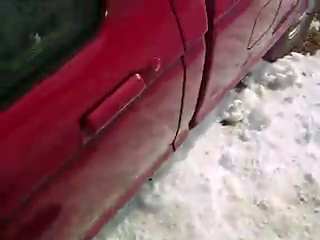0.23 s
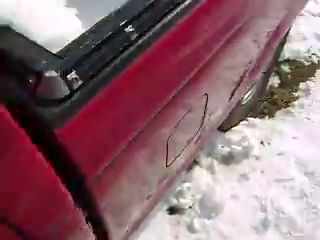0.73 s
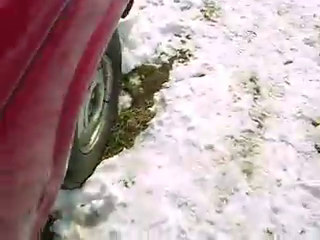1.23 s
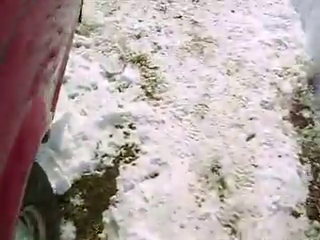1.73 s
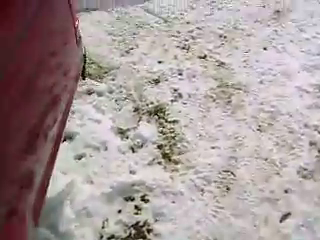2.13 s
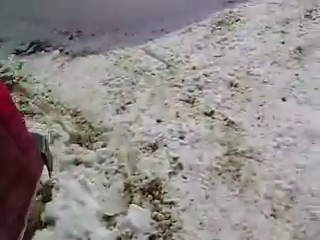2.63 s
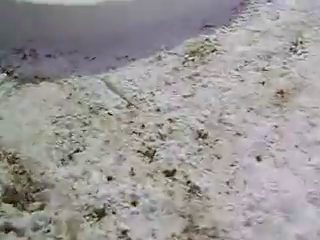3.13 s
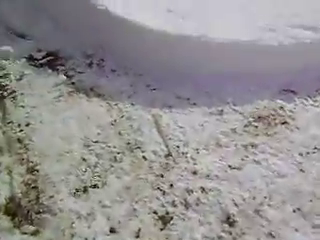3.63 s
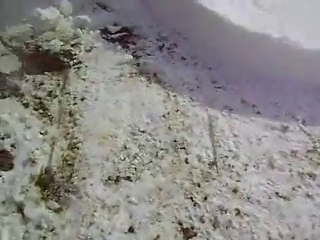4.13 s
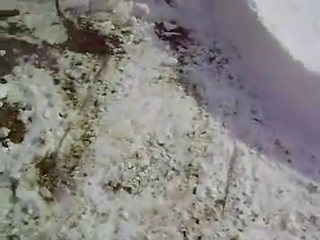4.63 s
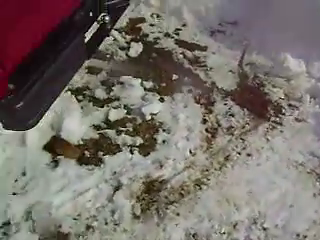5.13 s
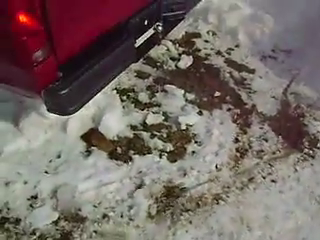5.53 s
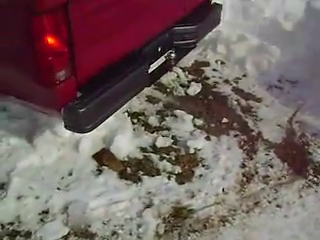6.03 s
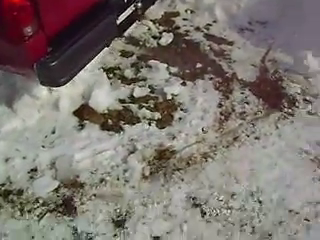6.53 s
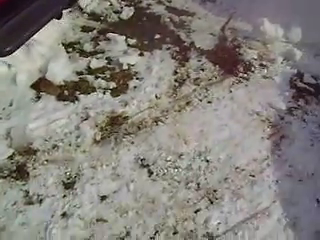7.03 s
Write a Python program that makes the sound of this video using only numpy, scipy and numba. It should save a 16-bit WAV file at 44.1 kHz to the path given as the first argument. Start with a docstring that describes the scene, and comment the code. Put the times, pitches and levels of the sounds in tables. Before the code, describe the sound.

Outdoors in snow, a rough V8 exhaust thumps and lopes at idle while boots crunch faintly and sharp whistling spits build into harsh crackle.

```python
"""Cold V8 idling in snow

A cold V8 pickup lopes at idle while someone walks a small camera along its side, through snow, to the tailpipe.
Each firing thumps as a pressure swing that rings the pipe, and blows a whistling puff of noisy gas.
Strong firings spit: a gliding whistle and a crack of hiss, some loud enough to clip.
The warming exhaust shell ticks, boots crunch as grains of noise, and the engine bay whirs underneath."""
import sys
import numpy as np
from scipy import signal
from scipy.io import wavfile
from scipy.ndimage import uniform_filter1d
from numba import njit

SR = 44100
rng = np.random.default_rng(int(sys.argv[2]) if len(sys.argv) > 2 else 0)


def bounce(signal):
    """Save signal as a 16-bit WAV file at the path given by the first command-line argument."""
    frames = np.transpose(np.atleast_2d(signal))
    limited = np.clip(frames, -1, 1)
    pcm = np.round(limited * 32767).astype(np.int16)
    wavfile.write(sys.argv[1], SR, pcm)


N = 320607


def undb(db):
    """Decibels to gain."""
    return 10 ** (np.asarray(db) / 20)


def unit(x):
    """Scale to rms 1."""
    return x / np.sqrt(np.mean(x ** 2))


@njit
def svf(x, hz, width):
    """State-variable band-pass, gain 1 at the centre."""
    y, band, low = np.empty(len(x)), 0., 0.
    g, damping = np.tan(np.pi * hz / SR), width / hz
    for i in range(len(x)):
        v = (band + g * (x[i] - low)) / (1 + g * (g + damping))
        band, low, y[i] = 2 * v - band, low + 2 * g * v, damping * v
    return y


def ring(x, modes):
    """Sum of resonances (center_hz, width_hz, level_db)."""
    return sum(undb(db) * svf(x, float(hz), float(width)) for hz, width, db in modes)


def add(track, at_s, sound):
    """Mix a short sound into a track."""
    i = max(int(at_s * SR), 0)
    sound = sound[:max(len(track) - i, 0)]
    track[i:i + len(sound)] += sound


def swell(rise_s, fall_s):
    """An envelope that builds up, then dies away; top 1."""
    t = np.arange(int(8 * fall_s * SR)) / SR
    shape = (1 - np.exp(-t / rise_s)) ** 2 * np.exp(-t / fall_s)
    return shape / shape.max()


def curve(t, points):
    """Read a two-column table as straight lines between its points."""
    return np.interp(t, *np.transpose(points))


DIP_HZ, DIP_WIDTH_HZ, DIP_SHARE = 1535, 370, 0.42


def dip(x):
    """Sound bouncing off ground and bodywork partly cancels in one band."""
    return x - DIP_SHARE * svf(x, float(DIP_HZ), float(DIP_WIDTH_HZ))


# surges of the cold idle, as the engine catches: peak_s, thump_rise_db, puff_rise_db
SURGE_TABLE = [(0.051, 5.5, 3.5), (0.599, 3, 0.5), (1.172, 5, 6.5), (1.737, 6.5, 8), (2.3, 5.5, 3.5),
               (2.874, 2.5, 3.5), (3.451, 7.5, 3), (4.038, 3.5, 1.5), (4.599, 4, 0.5), (5.17, 4.5, 2.5),
               (5.741, 3, 9.5), (6.269, 7.5, 7.5), (6.828, 4, 8), (7.39, -18, -8)]
FIRST_LOPE_S, SURGE_SHARPNESS = 0.42, 2.5  # length of the lope before the first surge; exponent


def lope(t):
    """Count of lopes at time t: whole numbers fall on the surges."""
    peak_s = np.array(SURGE_TABLE)[:, 0]
    return np.interp(t, np.r_[peak_s[0] - FIRST_LOPE_S, peak_s], np.arange(-1, len(peak_s)))


def surge(t):
    """Strength of the engine's catch: 1 at a surge, 0 halfway between two."""
    return np.abs(np.cos(np.pi * lope(t))) ** SURGE_SHARPNESS


# base levels between surges, broadly rising toward the tailpipe: time_s, thump_db, puff_db
LULL_LEVELS = [(0, -28.5, -40.5), (.8, -25, -40), (1.45, -25, -44), (2, -24.5, -45.5), (2.6, -22, -35),
               (3.15, -23.5, -40), (3.7, -23.5, -35.5), (4.3, -23, -32.5), (4.9, -21.5, -33.5),
               (5.45, -21.5, -30.5), (6, -24.5, -36), (6.5, -23.5, -33.5), (7.27, -20, -34.5)]
CYCLE_S = .1879  # one round of about eight firings


def load_db(t, column, throb_db, lag_s):
    """Lull level plus the nearest surge, and a throb each round as some cylinders fire harder."""
    nearest = np.round(lope(t)).astype(int).clip(0)
    rise_db = np.array(SURGE_TABLE)[nearest, column]
    lull = np.array(LULL_LEVELS)
    lull_db = np.interp(t, lull[:, 0], lull[:, column])
    throb = np.cos(2 * np.pi * (t - lag_s) / CYCLE_S)
    return lull_db + rise_db * surge(t) + throb_db * throb


IDLE_FIRING_HZ, SURGE_GAIN_HZ, SPEED_LAG_S = 42.1, 6.5, .03


def firings(t):
    """Each surge speeds the engine up; ordinary firings fill the gaps between spits, a little early or late."""
    due = np.cumsum(IDLE_FIRING_HZ + SURGE_GAIN_HZ * surge(t - SPEED_LAG_S)) / SR
    spit_s = np.array(SPIT_TABLE)[:, 0]
    marks = np.interp(np.r_[.01, spit_s + .005, t[-1]], t, due)
    # a whole number of firings, at least one, between neighbouring marks
    number = np.r_[0, np.cumsum(np.round(np.diff(marks)).clip(1))]
    even_due = np.interp(np.arange(number[-1] + 1), number, marks)
    even_s = np.interp(even_due, due, t)
    return even_s + 0.000668 * rng.standard_normal(N // 500)[:len(even_s)]


# exhaust pipe and muffler resonances, relative levels: center_hz, width_hz, level_db
PIPE_MODES = [(56.4, 7.9, 13), (91, 26, -3.5), (124.2, 16, -5), (178.8, 28, 3), (196.4, 16, 7.5),
              (239.6, 40, 12.5)]
# which of the two unevenly firing banks feeds each firing in a round: far_pipe (1 = far, 0 = near)
BANK_ORDER = [0, 1, 1, 0, 1, 0, 0, 1]
FAR_LAG_S, MUFFLER_HZ = 0.0052, 349
QUICKEN_S = .012  # the swing after a drop quickens: its phase has doubled by this time
REBOUND_SPAN, REBOUND_SPREAD = 2.41, .2  # decay of the swing in drop widths; its random spread (log)


def thumps(fire_s):
    """Each gas slug is a pressure rise and a steep drop that swings back and rings the pipe; turbulence rumbles."""
    chance = rng.standard_normal((N // 500, 5))[:len(fire_s)]
    far = np.resize(BANK_ORDER, len(fire_s))
    size_db = 1.3 * chance[:, 0]
    late_s = FAR_LAG_S * far + 0.0012 * chance[:, 1]
    # a firing that spits takes its thump size and timing from the spit
    for s, _, _, crack_ms, *_, thump_db in SPIT_TABLE:
        k = np.argmin(np.abs(fire_s - s - .005))
        size_db[k] = thump_db
        late_s[k] = s + crack_ms / 1000 + .004 - fire_s[k]
    slugs, t = np.zeros(N), np.arange(-600, 600) / SR  # 0 = the middle of the drop
    for s, db, (rise, drop, swing) in zip(fire_s + late_s, size_db, chance[:, 2:]):
        width_s = np.where(t < 0, 0.0028 * np.exp(0.26 * rise), 0.002 * np.exp(0.12 * drop))
        span = np.where(t < 0, 1.3, REBOUND_SPAN * np.exp(REBOUND_SPREAD * swing))
        level = undb(db + np.where(t < 0, 2.5 - 1.0 * rise, 0))
        wave = np.sin(t / width_s * (1 + t.clip(0) / QUICKEN_S))
        fade = np.exp(-(t / width_s / span) ** 2 / 2)
        add(slugs, s + t[0], -level * wave * fade)
    rumble = ring(rng.standard_normal(N), [(28.2, 9.9, 2.0), (58.7, 15, -4.5), (103.0, 65.0, -1.0)])
    pipe = unit(undb(-1) * slugs + ring(slugs, PIPE_MODES)) + undb(-11) * unit(rumble)
    # the muffler passes only the lows
    muffler = signal.butter(5, MUFFLER_HZ, fs=SR, output="sos")
    return unit(signal.sosfiltfilt(muffler, pipe))


CRACK_RISE_S, CRACK_FALL_S, TRAIL_S, TRAIL_DB = 0.0021, 0.0033, 0.015, -5
SHRILL_WIDTH_HZ, SHRILL_DB = 56, -4.5
RING_DB, RING_S = -18.5, 0.041  # the whistle rings on after a spit
RAGGED_DB = 2.5  # random spread of the crack's millisecond grains


def jet(hz, crack_ms, hiss_db, shrill_hz, air, body, chance):
    """One spit: an unsteady whistle that glides as the jet forms, a rough body, and a crack of partly shrill hiss."""
    t = np.arange(SR // 14) / SR
    shape = (t / .010 * np.exp(1 - t / .010)) ** 4
    wobble = uniform_filter1d(chance[:len(t)], size=40)
    pitch_hz = hz + (660 - hz) * np.exp(-(t / 0.006865) ** 2)  # from 660 Hz to its own pitch
    whistle = np.sin(2 * np.pi * np.cumsum(pitch_hz * (1 + 0.55 * wobble)) / SR)
    since = t - .008 - crack_ms / 1000
    crack = np.exp(-(since / np.where(since < 0, CRACK_RISE_S, CRACK_FALL_S)) ** 2 / 2)
    trail = undb(TRAIL_DB) * np.exp(-np.abs(since) / np.where(since < 0, CRACK_RISE_S, TRAIL_S))
    shrill = unit(svf(chance[:len(t)], float(shrill_hz), float(SHRILL_WIDTH_HZ)))
    hiss = air[:len(t)] + undb(SHRILL_DB) * shrill
    grains = np.repeat(chance[len(t):len(t) + 80], repeats=44)[:len(t)]
    ragged = undb(RAGGED_DB * grains)
    ring_on = undb(RING_DB) * (1 - np.exp(-(t / .014) ** 4)) * np.exp(-(t - .012) / RING_S)
    tone = (shape + ring_on) * whistle / 2
    rough = undb(-10.0) * shape * body[:len(t)]
    return tone + rough + undb(hiss_db - 7.5) * (crack + trail) * ragged * hiss


# strong firings that spit; each spit begins 8 ms before time_s, its crack comes crack_ms after time_s, and
# levels are relative: # time_s, level_db, whistle_hz, crack_ms, hiss_db, shrill_hz, thump_db
SPIT_TABLE = [(0.066, -23, 1206, 12, -12, 2200, 4.5), (1.081, -17.5, 1230, 4.5, -10, 2350.0, 4),
              (1.185, -20, 506, 9, -10, 2080, 2), (1.64, -15.5, 1246, 4, -5.5, 2516, 3.5),
              (1.73, -13.0, 1220, 2, -22, 2020.0, -2.5), (1.752, -17, 1247, -0.5, -3.5, 2070, 1),
              (2.158, -22.5, 680, 4.5, -4, 1520, -0.5), (2.176, -19.5, 1240, 5, -21, 2390.0, 8.5),
              (2.2, -11.5, 1160, 11, -10, 1650, -5), (2.246, -24, 530, 5.5, -27, 1660.0, -1),
              (2.289, -11, 1026, 1.5, -8.5, 1510.0, 1), (2.31, -12.5, 1106, 1.5, -9, 1780, 7),
              (2.721, -26, 800, 4.5, -4, 1560, 4.5), (2.797, -30, 660, 5.5, -10.5, 2050.0, -1),
              (2.823, -28, 690, 8, 1, 2250, 5), (2.848, -19, 870, 0, 0.5, 3030, -2.5),
              (2.87, -15.5, 1220, 6, -4.5, 4680, 7.5), (3.247, -18.5, 1140, 1, -6, 2990.0, 0.5),
              (3.322, -16.5, 747, 6, -7, 2880, 0.5), (3.35, -11, 1130, -4.5, -4, 2240, -7.5),
              (3.388, -17, 753, 4, -3.5, 1810, -1.0), (3.411, -17.5, 640, 6.5, -4, 3620, -4),
              (3.453, -15.5, 465, 1, 3.5, 4400, 0.5), (3.553, -17, 700, 7, -6.5, 3270, 3.5),
              (3.577, -19.5, 506, 2, -1.5, 2910, 0.5), (3.718, -35, 714, 5, 6, 3100, -5.5),
              (3.734, -18, 653, 10.5, -7, 1910, 7.5), (3.86, -12.5, 658, 7.5, -6.5, 2950, 1),
              (3.94, -17.5, 717, 3, -0.5, 2070, 0.5), (3.966, -14, 620, 2.5, -8, 3080.0, 1),
              (3.988, -8, 1337, 3, 0.5, 3040, 4), (4.011, -11, 712, 5.5, -1, 3260, 6.5),
              (4.076, -12.5, 775, 3, 5, 2160, 10.5), (4.115, -11, 684, 7.5, -8.5, 1970, 7.5),
              (4.136, -20.5, 730, 10.5, -5, 2110.0, -1.5), (4.295, -15, 738, 10, -10.0, 2220.0, 6.5),
              (4.419, -14, 650, 4.5, -1.5, 1460, 7.5), (4.498, -20, 726, 8, -0.5, 2090, -6),
              (4.529, -12, 636, 4, -9, 3070, 4), (4.551, -7, 1223, 3.5, 0, 1610, 1),
              (4.575, -12, 1280, -1, -1, 2040, 8), (4.64, -14, 1100, 1, 9.5, 3160, 8.5),
              (4.679, -12.5, 650, 11, -29, 2800.0, 4.5), (4.701, -14, 640, 4.5, -3.5, 3020, -8),
              (4.864, -15, 703, 4.5, -9, 2070, 3.5), (4.891, -25.5, 710, 6, 2, 3950, 6),
              (4.995, -5, 1173, 4.5, -10.5, 3770, -3), (5.069, -22.5, 653, 9, -1, 4740, 0),
              (5.1, -17.5, 530, 4.5, 1, 2210, 4), (5.123, -3.5, 1020, 1.5, -5.5, 2220, -4.5),
              (5.143, -9, 1004, 7, -3, 2230, 5), (5.21, -4, 898, 0.5, -1.5, 2834, 5.5),
              (5.246, -11.5, 814, 14.5, -33, 2550, -23), (5.268, -15, 500, 6, -0.5, 2290, 4),
              (5.387, -19, 1000, 0.5, -31, 2180, 5.5), (5.423, -12.5, 747, 9.5, -4.5, 2490, 6.5),
              (5.451, -19.0, 530, 5, -5, 2240, 0.5), (5.529, -19.5, 1020, 11.5, -6, 2220, -6.5),
              (5.547, -10.5, 738, 1, -2, 1640, 3), (5.623, -12.5, 783, 5.5, -21, 2740, 2.5),
              (5.668, -3, 1410, 3, -5.5, 1700, 1.5), (5.693, -9.5, 1215, 4, -8, 2240, 5.5),
              (5.755, -5.5, 1198, 1, -3.5, 2615, 3), (5.797, -12.5, 806, 3, -9, 2160, 9.5),
              (5.986, -13.5, 620, 7.5, -10, 1930, 9), (6.014, -22.5, 1110, 7.5, -4, 2600, 8.5),
              (6.121, -10, 1295, 2, -6, 1420, 6), (6.149, -19, 980, 10, -29, 4220.0, -11),
              (6.193, -16.5, 740, 5.5, -5.5, 2130.0, -6), (6.222, -10, 543, 3, -8, 3680, -3),
              (6.244, -3, 991, 5, -8, 2664, 3), (6.267, -9.5, 854, 4.5, -3, 4320, 4.5),
              (6.314, -19, 930, -6.5, -16, 2110.0, -1.5), (6.336, -33.5, 694, 3.5, 10, 2970.0, -2),
              (6.355, -38, 690, 8, 7, 2500.0, -2.5), (6.369, -15, 840, 4, -13, 2110.0, 1),
              (6.393, -26.5, 730, 9, 2.5, 2370, 0), (6.548, -31, 644, -1.5, -7, 2600, 5),
              (6.689, -17.5, 1105, 6, -0.5, 2575, 7.5), (6.72, -2.5, 1150, 2, -9.5, 3990, 0.5),
              (6.76, -18.5, 790, 7.5, -1, 1700, 3.5), (6.8, -4, 1008, 10.5, -2.5, 3856, -1.5),
              (6.826, -2.5, 1004, -2.3, -12.5, 2160, 12), (6.914, -17, 804, 3, -3, 1480, 3),
              (6.942, -26, 680, 2.5, 6, 2930, 3.5), (7.063, -18, 1045, -1.5, -10, 2500, -3),
              (7.106, -14.5, 1083, 5, -8, 2970, 8.5), (7.128, -31, 710, 10.5, 11, 4600, 1.5),
              (7.225, -15, 983, 11.5, -3.5, 1510, 14)]
# tailpipe mouth resonances as the gas rings it, relative levels: center_hz, width_hz, level_db
MOUTH_MODES = [(543, 178, 8.5), (741, 140, 6.5), (1046, 52, 7.5), (1181, 120, 5.5), (2032, 97, -6.5),
               (3130, 16, -10.5), (2120, 2720, -4.5), (4550, 1000, -22), (5100, 790, -8.5)]
# whistle of ordinary firings against their noise, as the camera turns to the tailpipe: time_s, level_db
FACING_CURVE = [(0, -29), (2, 5), (3.298, 0.5), (7.27, -3.5)]


def gas(fire_s, puff_db):
    """Every firing blows a noisy, softly whistling puff through the mouth; strong ones spit, and the mouth rings on."""
    gate, soft, chance = np.full(N, .22), np.zeros(N), rng.standard_normal((N // 500, 3))
    noise = rng.standard_normal((3, N + SR))  # air, body, raw chance
    noise[:2] = unit(ring(noise[0], MOUTH_MODES[4:])), unit(ring(noise[1], MOUTH_MODES[:5]))
    puff = swell(.005, .007)
    for s, (size, loud, pitch) in zip(fire_s, chance):
        add(gate, s - .012, undb(4.0 * size) * puff)
        whistle_hz = (1090 if pitch > .6 else 700) * np.exp(.06 * size)
        shrill_hz = 2600 * np.exp(0.17 * size)
        soft_jet = jet(whistle_hz, 2.7, -15.0, shrill_hz, *noise[:, int(s * SR):])
        add(soft, s - .015, undb(5.6 * loud) * soft_jet)
    # condensed water spatters in the gas
    spatter = np.repeat(rng.exponential(size=N // 90 + 1).clip(0, 3), repeats=90)[:N]
    rush = ring(gate * undb(2.0 * spatter) * rng.standard_normal(N), MOUTH_MODES)
    facing = undb(curve(np.arange(N) / SR, FACING_CURVE))
    puffs = undb(puff_db) * (unit(rush) + facing * unit(soft))
    spits = np.zeros(N)
    for s, db, *voice, _ in SPIT_TABLE:
        add(spits, s - .008, undb(db) * jet(*voice, *noise[:, int(s * SR):]))
    tail = ring(spits, [(hz, width / 5, db) for hz, width, db in MOUTH_MODES[:6]])
    mouth = dip(puffs) + spits + undb(-16.0) * tail
    # the narrow mouth radiates little of this in the bass
    return signal.sosfilt(signal.butter(3, 370, "high", fs=SR, output="sos"), mouth)


# ticks of warming metal: start_s, level_db, ring_s (decay time constant)
TICK_TABLE = [(0.63, -26.5, 0.0051), (.988, -24.5, 0.0093), (1.468, -17.5, 0.0016)]


def ticks():
    """Sudden cracks of the warming exhaust shell: short bursts of resonant noise."""
    out = np.zeros(N)
    noise = unit(ring(rng.standard_normal(SR), [(1130, 410, 7), (2970, 7600, -21)]))
    for s, db, ring_s in TICK_TABLE:
        shape = swell(.0004, ring_s)
        grain = noise[int(s * 9000):][:len(shape)]  # another stretch of noise for each tick
        add(out, s, undb(db) * shape * grain)
    return out


# boots in snow, level before the sag: start_s, length_s, level_db
STEP_TABLE = [(0.163, 0.079, -34.5), (0.425, 0.097, -23), (1.487, 0.16, -36.5), (2.377, 0.27, -30.5),
              (6.536, 0.056, -23)]
STEP_ATTACK_S, STEP_SAG_DB, STEP_RELEASE_S = 0.015, -5.5, 0.034


def boots():
    """Snow crystals break in dense grains while the sole presses down."""
    hiss = rng.standard_normal(N)
    strength = np.repeat(rng.exponential(size=N // 60 + 1), 60)[:N]
    grains = hiss * undb(2.4 * strength)
    crunch = unit(ring(grains, [(1100, 2500, -0.82), (2700, 2100, -0.72), (4900, 1200, -1.17)]))
    t, press = np.arange(N) / SR, np.zeros(N)
    for s, length_s, db in STEP_TABLE:
        level = undb(db + STEP_SAG_DB * ((t - s) / length_s).clip(0, 1))
        attack = ((t - s) / STEP_ATTACK_S).clip(0, 1)
        press += level * attack * np.exp(-(t - s - length_s).clip(0) / STEP_RELEASE_S)
    return press * crunch


# engine bay resonances, relative levels, the growl first: center_hz, width_hz, level_db
BAY_MODES = [(298, 450, 14.5), (600, 280, 19.5), (910, 270, 20), (1140, 150, 8), (2100, 200, -6),
             (4200, 2000, -38.5)]
# level of the whir: time_s, level_db
BAY_CURVE = [(0, -39), (1.5, -40), (3.2, -41.5), (5, -35), (7.27, -30.5)]
# accessory whines, nominal pitch and level at the start: pitch_hz, level_db
WHINE_TABLE = [(646.0, -43), (947.5, -44), (1075, -44), (2331, -57.5)]


def engine_bay(t):
    """Fan, belts and valve gear blur into a broad whir, whose growl and whines fade as the camera walks off."""
    air = rng.standard_normal(N)
    growl = undb(12 - 1.8 * t) * ring(air, BAY_MODES[:1])
    whir = undb(curve(t, BAY_CURVE)) * unit(dip(growl + ring(air, BAY_MODES[1:])))
    drift = 1 + 0.2 * uniform_filter1d(rng.standard_normal(N), size=1500)
    seconds = np.cumsum(drift) / SR  # time that runs a little unevenly
    whine = sum(undb(db) * np.sin(2 * np.pi * hz * seconds) for hz, db in WHINE_TABLE)
    return whir + whine * undb(-2.5 * t)


def scene():
    """Exhaust thumps and gas, ticks, boots and the engine bay."""
    t = np.arange(N) / SR
    fire_s = firings(t)
    thump_db = load_db(t, column=1, throb_db=2.5, lag_s=0.029)
    puff_db = load_db(t, column=2, throb_db=2, lag_s=0.019)
    exhaust = undb(thump_db) * thumps(fire_s) + gas(fire_s, puff_db)
    return (exhaust + ticks() + boots() + engine_bay(t))[None]


CAMERA_HZ, TOP_HZ = 5000, 15900
CLIP, KNEE = .71, .6  # ceiling and start of bending, full scale 1


def record(dry):
    """The camera keeps only a narrow band; the loudest peaks then bend over and clip, which splashes treble above it."""
    narrow = signal.sosfilt(signal.butter(10, CAMERA_HZ, fs=SR, output="sos"), dry)
    narrow = signal.sosfilt(signal.ellip(9, .5, 85, 5850, fs=SR, output="sos"), narrow)
    narrow = signal.sosfilt(signal.butter(2, 20, "high", fs=SR, output="sos"), narrow)
    over = (np.abs(narrow) - KNEE).clip(0) / (CLIP - KNEE)
    kept = over / (1 + over ** 4) ** .25  # levels off at 1
    bent = narrow - np.sign(narrow) * (CLIP - KNEE) * (over - kept)
    return signal.sosfilt(signal.ellip(10, .2, 80, TOP_HZ, fs=SR, output="sos"), bent)


dry = scene()
out = record(dry)
bounce(out)
```